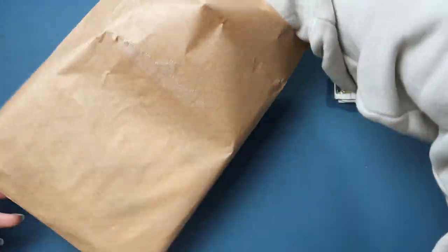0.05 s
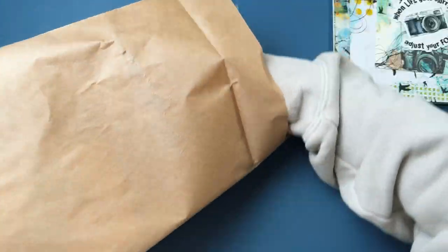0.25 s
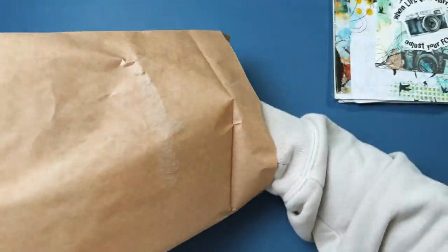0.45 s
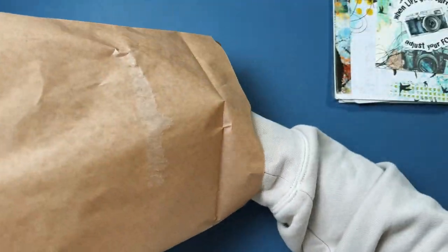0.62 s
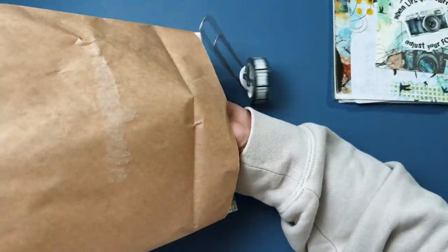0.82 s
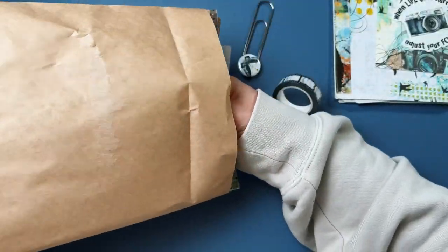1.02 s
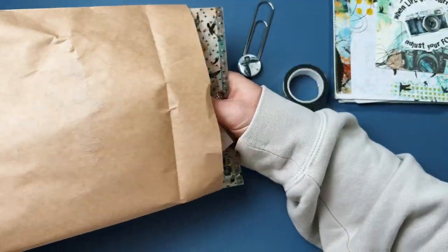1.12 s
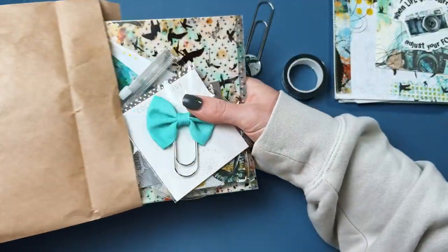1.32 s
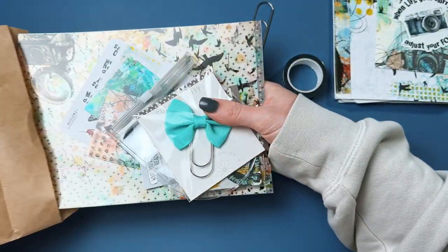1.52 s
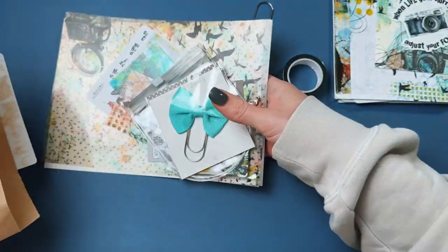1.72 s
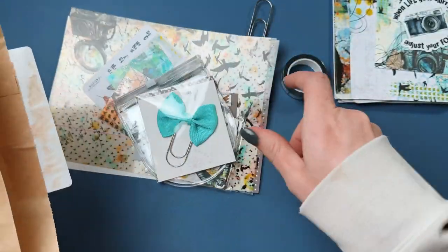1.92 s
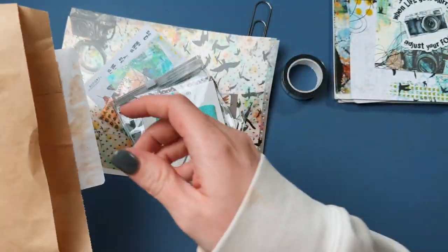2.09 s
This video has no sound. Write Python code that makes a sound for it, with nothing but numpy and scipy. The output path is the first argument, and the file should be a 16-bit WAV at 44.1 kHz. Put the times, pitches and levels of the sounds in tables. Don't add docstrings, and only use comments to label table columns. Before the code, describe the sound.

A stiff paper mailer crinkles in the hand, building to its sharpest snap near 0.35 s, with popping bag walls and dull desk knocks. Uneven crackling and crushing continue, with a firm knock and rubbing swell near 0.8 s and a strong crackle and thump around 1.03 s. Sheets then slide out more softly until a last snap and low knock at 1.9 s. Close, dry small room, faint mains hum.

```python
import sys
import numpy as np
from scipy import signal
from scipy.fft import rfft, irfft, next_fast_len
from scipy.io import wavfile
from scipy.ndimage import uniform_filter1d, map_coordinates

SR = 44100
rng = np.random.default_rng(int(sys.argv[2]) if len(sys.argv) > 2 else 0)


def waveform_to_disk(signal):
    frames = np.transpose(np.atleast_2d(signal))
    scaled = np.clip(frames, -1, 1) * 32767
    samples = np.round(scaled).astype(np.int16)
    wavfile.write(sys.argv[1], SR, samples)


def convert_level_to_amplitude(level_db):
    exponent = np.asarray(level_db, float) / 20
    return 10 ** exponent


N = 94815

# (frequency [Hz], level [dB], t60 [s])
DESK = [(77.5, -4, 0.13), (125, -5, .17), (183, -8.5, 0.064), (269, 8, 0.088), (391, 0.5, 0.059),
        (536, -0.5, 0.028)]


def unit(x):
    return x / np.sqrt(np.mean(x ** 2) + 1e-20)


def along(points, hz):
    f, v = np.transpose(points)
    return np.interp(np.log(hz + 1), np.log(f + 1), v)


def filtered(x, response):
    m = next_fast_len(N + 8192)
    return irfft(rfft(x, m) * response(np.fft.rfftfreq(m, 1 / SR)), m)[..., :N]


def wobble(rate):
    knots = rng.standard_normal(int(N * rate / SR) + 4)
    return map_coordinates(knots, [np.arange(N) * rate / SR])


def crackle(per_s, spread_db, tick_s, share):
    patchy_db = 2
    sizes = (rng.random(N) < per_s / SR) * convert_level_to_amplitude(spread_db * rng.exponential(size=N).clip(0, 3))
    ticks = unit(signal.lfilter([1], [1, -np.exp(-1 / (tick_s * SR))], sizes))
    z = signal.stft(rng.standard_normal((2, N)), nperseg=256)[2]
    patches = uniform_filter1d(rng.standard_normal(z.shape[1:]), size=6, axis=0)
    patches = uniform_filter1d(patches, size=5, axis=1)
    hiss = signal.istft(z * convert_level_to_amplitude(patchy_db * unit(patches)), nperseg=256)[1][:, :N]
    return unit(np.hypot(1, share * ticks) * hiss)


def coloured(low, high, spectrum):
    pivot_hz = 3320
    # (centre [Hz], width [Hz], gain [dB])
    wall = [(1800, 1900, 4.5), (3024, 160, 1.5)]

    def bright(f):
        return (1j * f / (pivot_hz + 1j * f)) ** 2

    def body(f):
        resonance_db = sum(db / (1 + ((f - c) / w) ** 2) for c, w, db in wall)
        return convert_level_to_amplitude(along(spectrum, f) + resonance_db)

    norm = np.sqrt(np.mean(body(np.linspace(0, SR / 2, num=2000)) ** 2))
    dull_part = filtered(low, lambda f: body(f) * (1 - bright(f)))
    bright_part = filtered(high, lambda f: body(f) * bright(f))
    return (dull_part + bright_part) / norm


def background():
    hum_hz, hum_db, octave_db, floor_db = 59.2, -54.5, -23, -58
    # (frequency [Hz], density [dB per Hz])
    rumble = [(20, -42.5), (60, -3.5), (170, -26.5), (700, -61), (2300, -52.5), (4000, -69.5), (9000, -76),
              (12000, -101)]
    turn = 2 * np.pi * hum_hz * np.arange(N) / SR + 0.1 * wobble(4)
    hum = np.sin(turn) + convert_level_to_amplitude(octave_db) * np.sin(2 * turn)
    hum = convert_level_to_amplitude(hum_db + 4.5 + 0.7 * wobble(11)) * hum
    room = filtered(rng.standard_normal(N), lambda f: convert_level_to_amplitude(along(rumble, f)))
    return hum + convert_level_to_amplitude(floor_db) * unit(room)


def echo(x, t60):
    tail = rng.standard_normal(SR // 4) * convert_level_to_amplitude(-60 * np.arange(SR // 4) / SR / t60)
    return signal.fftconvolve(x, tail[None] / np.linalg.norm(tail), axes=1)[:, :N]


def knocks():
    # (time [s], peak [dB], hardness [Hz])
    hits = [
        (0.327, -17, 112),
        (.42, -27, 190),
        (0.758, -30, 202),
        (0.807, -16.5, 152),
        (1.038, -18, 158),
        (1.233, -28, 160),
        (1.645, -27, 202),
        (1.894, -18, 93.5),
    ]
    out, t = np.zeros(N + SR), np.arange(SR // 2) / SR
    for s, db, hard_hz in hits:
        vary = rng.normal(size=(len(DESK), 2))
        ring = np.zeros(len(t))
        for (hz, mode_db, t60), (v, w) in zip(DESK, vary):
            level = convert_level_to_amplitude(db - 7 + mode_db + 1.5 * v - 60 * t / t60) / (1 + (hz / hard_hz) ** 4)
            ring += level * np.sin(2 * np.pi * hz * (1 + w / 50) * t)
        out[round(s * SR):][:len(t)] += (1 - np.exp(-t / 0.0043)) * ring
    return filtered(out[:N], lambda f: 1j * f / (45 + 1j * f))


def thumps():
    fall_s, rough_db = 0.004, 2
    # (time [s], peak [dB], first pitch [Hz], last pitch [Hz], t60 [s])
    soft_hits = [(.431, -27, 1200, 344, 0.045), (.585, -38, 484, 150, 0.068),
                 (.624, -28.5, 587, 390, 0.048), (.684, -24, 298, 266, 0.05), (.712, -27, 540, 390, 0.036),
                 (.753, -26.5, 504, 334, 0.1), (.8025, -15.5, 794, 253, 0.05),
                 (.81, -22.5, 202, 118.4, 0.12), (.832, -27.5, 238, 129, 0.14),
                 (.917, -24, 750, 317, 0.042), (0.926, -33, 200, 111, 0.087), (.39, -30.5, 295, 181, 0.052),
                 (1.484, -36, 196, 128, 0.055), (.355, -26.5, 710, 444, 0.076),
                 (1.027, -17, 598, 420, 0.041), (1.136, -38, 220, 129, 0.06), (1.226, -22, 784, 290, 0.036),
                 (1.272, -23.5, 665, 540, 0.032), (1.287, -44, 585, 200, 0.062),
                 (1.415, -33, 730, 500, 0.049), (1.644, -31, 680, 525, 0.066),
                 (1.887, -38.5, 885, 259, 0.11)]
    out, t = np.zeros(N + SR), np.arange(SR // 4) / SR
    for s, db, first_hz, last_hz, t60 in soft_hits:
        slide = (first_hz - last_hz) * fall_s * (1 - np.exp(-t / fall_s))
        turn = 2 * np.pi * (last_hz * t + slide)
        swing = np.sin(turn) + 0.48 * np.sin(1.4 * turn)
        out[round(s * SR):][:len(t)] += convert_level_to_amplitude(db - 60 * t / t60) * (1 - np.exp(-t / 0.0007)) * swing
    return out[:N] * convert_level_to_amplitude(rough_db * wobble(170))


def pops():
    ring_cycles, drop, drop_cycles = 26, 0.6, 2
    # (time [s], peak [dB], final pitch [Hz])
    panels = [(.046, -45, 1500), (.288, -31, 1670), (.5686, -24, 1800), (.7566, -24, 1910),
              (1.8995, -28, 1940), (.133, -32.5, 1080), (0.235, -22, 1230), (0.3563, -15, 1800),
              (0.4312, -13, 4410), (0.674, -26, 1800), (0.887, -12.5, 4070), (.948, -31.5, 1640),
              (1.589, -29.5, 1100), (1.886, -14.5, 1800)]
    out, t = np.zeros(N + SR), np.arange(SR // 8) / SR
    for s, db, hz in panels:
        slide = drop * drop_cycles / hz * (1 - np.exp(-t * hz / drop_cycles))
        turn = 2 * np.pi * hz * (t + slide)
        ring = np.sin(turn) + 0.55 * np.sin(1.6 * turn)
        level = convert_level_to_amplitude(db - 0.5 - 60 * t * hz / ring_cycles) * (1 - np.exp(-2 * t * hz))
        out[round(s * SR):][:len(t)] += level * ring
    return out[:N]


def rubbing():
    scrape_db = -4
    # (time [s], level [dB])
    strokes = [(0, -41), (.12, -49), (.28, -43.5), (.47, -41.5), (0.579, -39), (0.801, -30), (0.869, -42.5),
               (0.949, -40.5), (.99, -44), (1.081, -39), (1.298, -35), (1.39, -41.5), (1.48, -41),
               (1.702, -47), (1.849, -51.5), (1.874, -64), (2.018, -65), (2.05, -83)]
    # (frequency [Hz], density [dB per Hz])
    sheets = [(60, -29), (150, -12.5), (870, -3.5), (2030, -7.5), (6330, -9), (9900, -12), (15500, -9),
              (16300, -40.5)]
    s, db = np.transpose(strokes)
    level = convert_level_to_amplitude(np.interp(np.arange(N) / SR, s, db) + 2.6 * wobble(24.33) + 2.4 * wobble(90))
    drive = level * crackle(690, 11.0, 0.00064, 0.43)

    def desk(f):
        return sum(1j * f * 60 / (hz * hz - f * f + 1j * f * 60) for hz, _, _ in DESK)

    scrape = unit(filtered(rng.standard_normal((2, N)), desk))
    scrape = level * convert_level_to_amplitude(scrape_db - 3 + 1.2 * wobble(18)) * scrape
    return coloured(drive, drive, sheets) + scrape


def creases():
    crack_db, crack_t60_s, rise_s = 2.5, 0.0055, 0.00022
    # (time [s], peak [dB],
    # brightness [dB], t60 [s])
    snaps = [(0.0014, -63, -12, 0.031), (0.046, -25, -7.5, 0.027), (0.071, -32.5, -7.5, 0.071),
             (0.134, -35.5, -9, 0.048), (0.159, -19.5, 5.5, 0.039), (0.1895, -25, -3, 0.042),
             (0.2337, -13, -6.5, 0.044), (0.288, -31.5, -3.5, 0.042), (0.307, -20.5, -5.5, 0.042),
             (0.313, -15.5, -7.5, 0.064), (0.3541, -2.5, 9.5, 0.042), (0.4303, -14, -3.5, 0.053),
             (0.5041, -22, 2.5, 0.13), (0.593, -22.5, 2.5, 0.082), (0.3595, -8, 2, 0.071),
             (0.5229, -19, 15, 0.024), (0.5688, -18.5, -2.5, 0.065), (0.626, -14, -13, 0.075),
             (0.6394, -29.5, -4, 0.042), (0.675, -11, -13.5, 0.042), (0.683, -18, -11, 0.03),
             (0.7574, -13.5, -9.5, 0.042), (0.8024, -28, -4, 0.042), (0.824, -13.5, -5.5, 0.05),
             (0.842, -22, -5, 0.02),
             (0.8862, -22, 18, 0.049), (0.9154, -17, 12, 0.06), (0.9483, -10, 2.5, 0.0062),
                 (1.0189, -15.5, 14.5, 0.096), (1.0324, -6, -8, 0.019), (1.044, -31, -8, 0.037),
                 (1.06, -13, 11, 0.019), (1.096, -31.5, 15, 0.36), (1.2253, -24.5, 13, 0.074),
                 (1.2377, -11.5, -8, 0.015), (1.261, -21.5, 7, 0.1), (1.332, -23, 3.5, 0.16),
                 (1.5041, -25.5, 17, 0.051), (1.5162, -23, 16, 0.027), (1.202, -25, 15.5, 0.023),
                 (1.286, -26, 5, .03), (1.356, -25, -1.5, 0.074), (1.5895, -26, 8.5, 0.055),
                 (1.6435, -19.5, -3.5, 0.026), (1.6505, -26.5, 22.5, 0.022), (1.666, -24.5, 19, 0.028),
                 (1.674, -27, -7.5, 0.037), (1.691, -29, -21, 0.049), (1.7499, -31, 22, 0.022),
                 (1.8247, -34.5, -7.5, 0.078), (1.8861, -17.5, 3.5, 0.037), (1.899, -19.5, 0, 0.045),
                 (1.9097, -27.5, 8, 0.036), (1.9623, -43, 14.5, 0.053)]
    # (middle [s], half length [s], level [dB], brightness [dB])
    crushes = [(.01, 0.013, -40, -18), (0.212, 0.01, -57, 19.5), (0.327, 0.016, -24, -17.5),
               (0.344, .006, -27, 4), (0.362, 0.023, -24.5, -15), (.265, 0.0063, -35.5, -17),
               (0.419, 0.0048, -24.5, -7.5), (1.417, 0.0036, -33.5, 15), (0.635, 0.031, -29.5, -7.5),
               (0.738, 0.033, -31, -6), (0.77, 0.017, -26.5, -8), (0.808, 0.0092, -33.5, 14),
               (1.028, 0.011, -20.5, 5.5), (1.054, 0.019, -24.5, -8.5), (1.278, 0.014, -35.5, -2),
               (1.47, 0.019, -45, -14.5), (1.363, 0.028, -46.5, -10), (1.659, 0.035, -40.5, 12)]
    # (frequency [Hz], density [dB per Hz])
    paper = [(100, -42), (250, -27), (480, -19), (850, -13.5), (1750, -4.5), (5500, -12.5), (9000, -18.5),
             (16000, -23)]
    t, drive = np.arange(N) / SR, crackle(700, -4.5, 0.00048, 0.7)
    low, high = np.zeros(N), np.zeros(N)
    for s, db, bright_db, t60 in snaps:
        u = (t - s).clip(0)
        decay = convert_level_to_amplitude(-60 * u / max(t60, 0.004)) + convert_level_to_amplitude(crack_db - 60 * u / crack_t60_s)
        shape = convert_level_to_amplitude(db - 11.5) * (1 - np.exp(-u / rise_s)) * decay
        low += shape ** 2
        high += (shape * convert_level_to_amplitude(bright_db)) ** 2
    for s, half, db, bright_db in crushes:
        shape = convert_level_to_amplitude(db) * np.exp(-((t - s) / half) ** 2)
        low += shape ** 2
        high += (shape * convert_level_to_amplitude(bright_db)) ** 2
    return coloured(np.sqrt(low) * drive, np.sqrt(high) * drive, paper)


def scene():
    room_t60_s, room_db = 0.15, -12.5
    # (frequency [Hz], side over mid [dB])
    ports = [(60, -19), (250, -14.5), (650, -7.5), (1100, -6), (1700, -24), (2500, -5), (9000, 1),
             (12000, 17), (15500, 8)]
    # (frequency [Hz], unrelated share of the side signal [0-1])
    scatter = [(500, 0.94), (2500, 1), (6000, .7), (10000, .5)]
    near = creases() + rubbing() + knocks() + pops() + thumps()
    direct, scattered = near + convert_level_to_amplitude(room_db) * echo(near, room_t60_s) + background()

    def turn(f):
        return np.arctan(convert_level_to_amplitude(along(ports, f)))

    def share(f):
        return np.clip(along(scatter, f), 0, 1)

    mid = filtered(direct, lambda f: np.cos(turn(f)))
    side = filtered(direct, lambda f: -1j * np.sin(turn(f)) * np.sqrt(1 - share(f)))
    side += filtered(scattered, lambda f: -1j * np.sin(turn(f)) * np.sqrt(share(f)))
    return np.array([mid + side, mid - side])


def gated_treble(x):
    low_hz, split_hz, calm_top_hz = 9600, 14500, 15900
    frame, offset, gap_share = 1024, 234, 0.25
    # (from [s], to [s], up to [Hz])
    treble_spans = [(.128, .175, 13000), (.231, .24, 17000), (.25, .3, 12000), (.302, .377, 16000),
                    (.411, .422, 13000), (.427, .437, 17000), (.516, .56, 16000), (.68, .724, 11900),
                    (.795, .87, 10700), (.84, .846, 13000), (.884, .893, 17000), (.893, .93, 16000),
                    (.965, 1.068, 16000), (1.078, 1.14, 10400), (1.38, 1.49, 10300), (1.512, 1.524, 17000),
                    (1.56, 1.63, 10500), (1.64, 1.735, 16000), (1.746, 1.754, 17000), (1.883, 1.892, 17000),
                    (1.892, 1.925, 16000)]
    t, mid = np.arange(N) / SR, x.mean(0)

    def soft(gate):
        return uniform_filter1d(gate.astype(float), size=128)

    gaps = np.repeat(rng.random(N // frame + 2) < gap_share, frame)[frame - offset:][:N]
    upper = filtered(mid, lambda f: (f > low_hz) & (f < split_hz))
    upper = upper + soft(gaps) * filtered(mid, lambda f: (f >= split_hz) & (f <= calm_top_hz))
    upper = upper + filtered(x, lambda f: f > calm_top_hz)
    kept = np.zeros_like(x)
    for hz in sorted({row[2] for row in treble_spans}):
        gate = sum((t > a) & (t < b) for a, b, top_hz in treble_spans if top_hz == hz)
        kept += filtered(upper, lambda f: f < hz) * soft(gate)
    return x - upper + kept


def top_cut(x):
    return signal.sosfilt(signal.butter(12, 17010, fs=SR, output="sos"), x)


def record(dry):
    low_cut_hz, top_hz = 42, 16900
    mix = filtered(dry, lambda f: (1j * f / (low_cut_hz + 1j * f)) ** 2 * (f < top_hz))
    mix = gated_treble(mix)
    return top_cut(mix)


dry = scene()
out = record(dry)
waveform_to_disk(out)
```